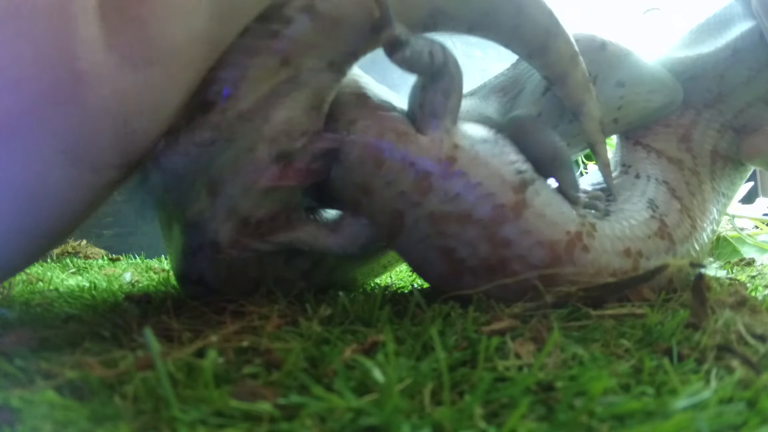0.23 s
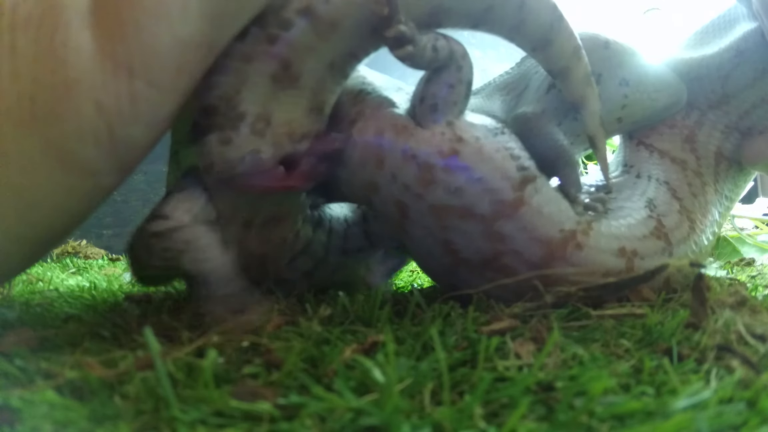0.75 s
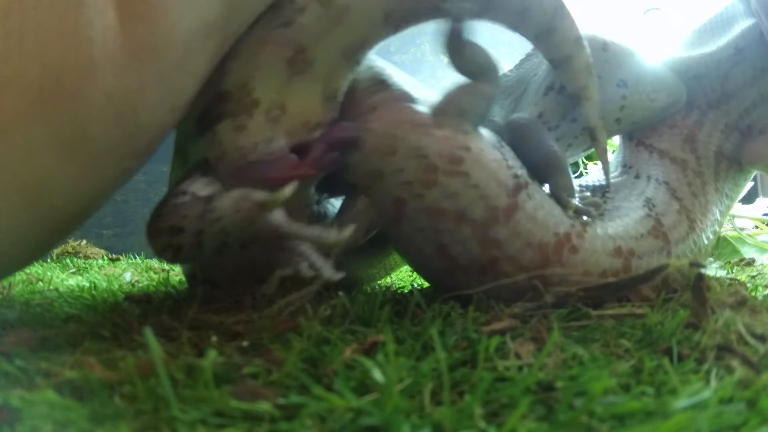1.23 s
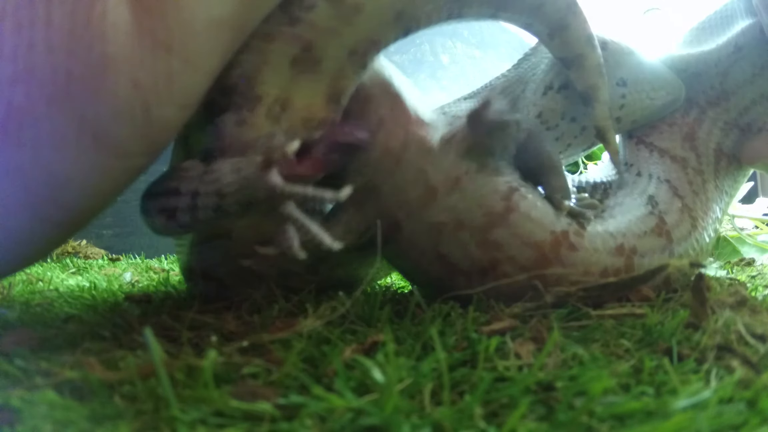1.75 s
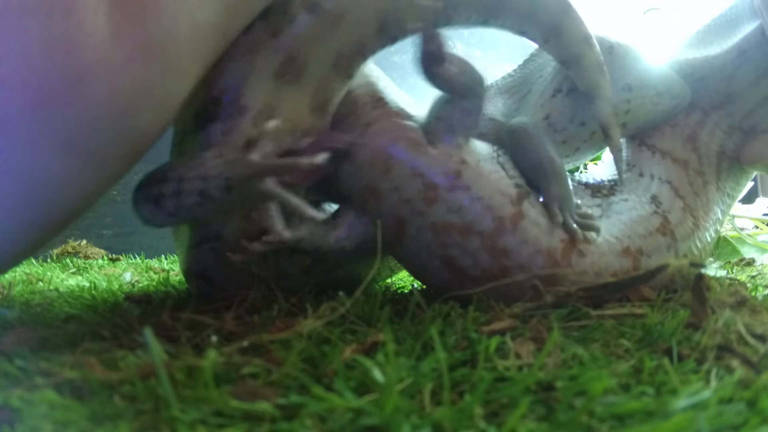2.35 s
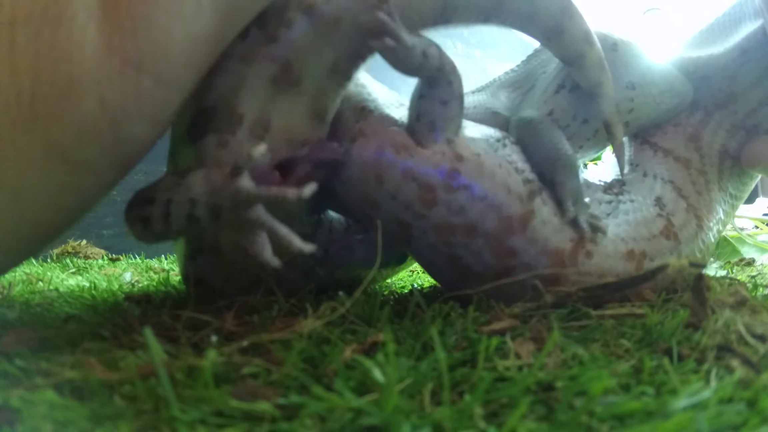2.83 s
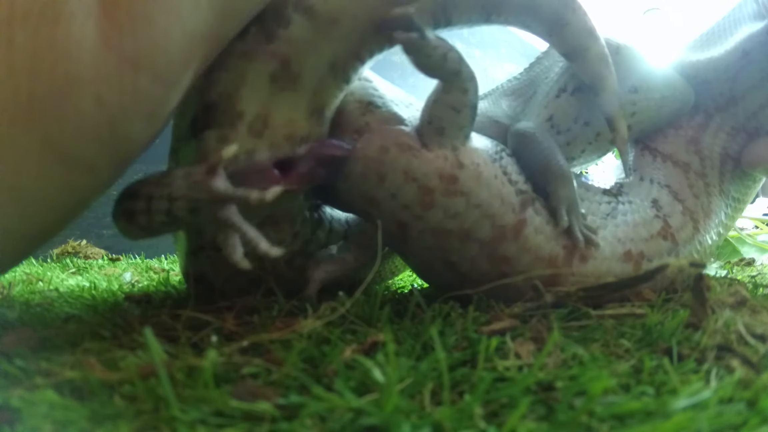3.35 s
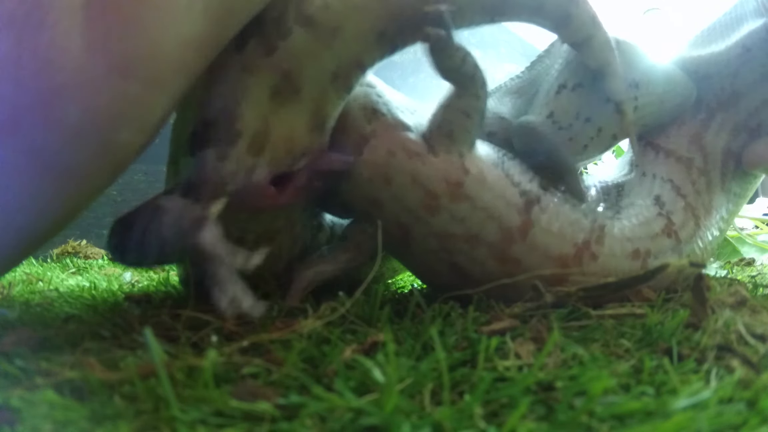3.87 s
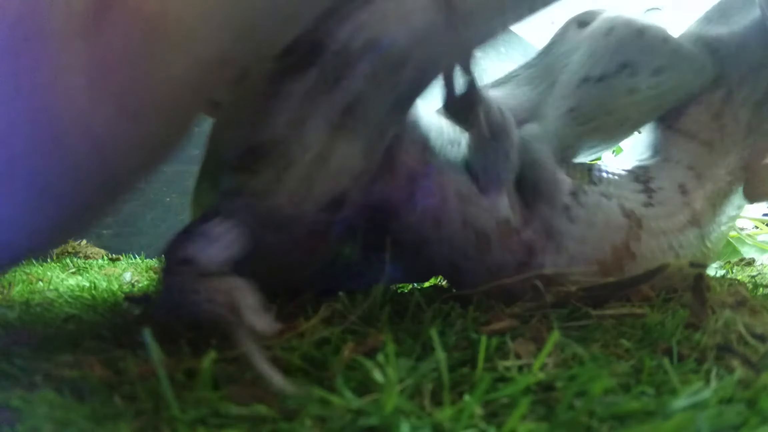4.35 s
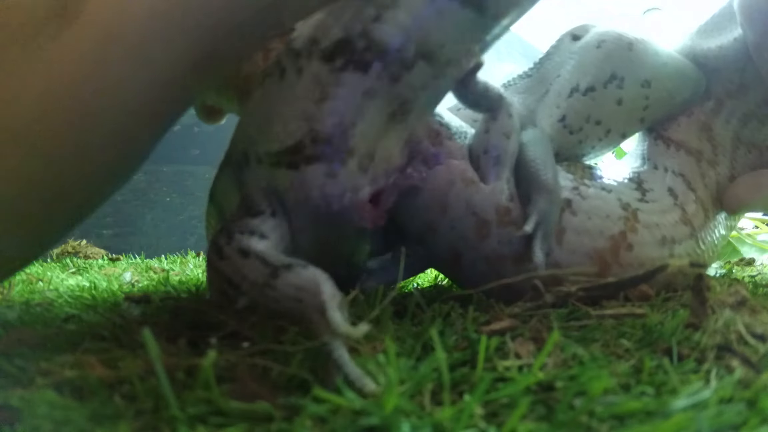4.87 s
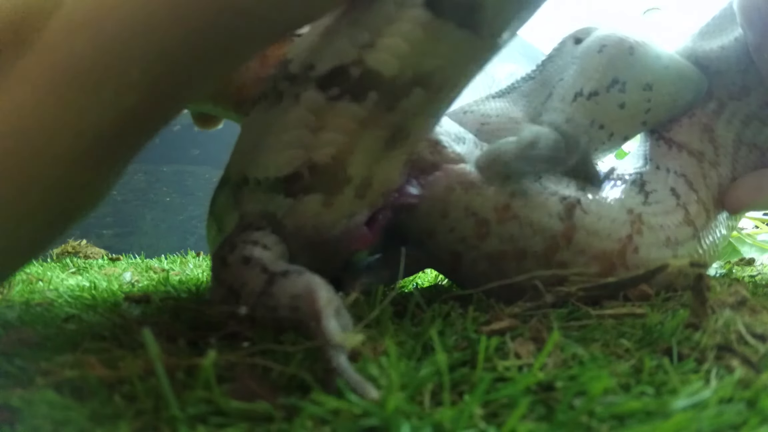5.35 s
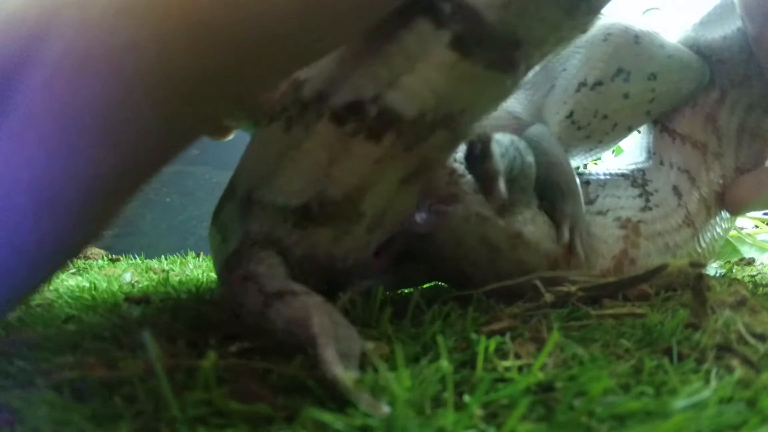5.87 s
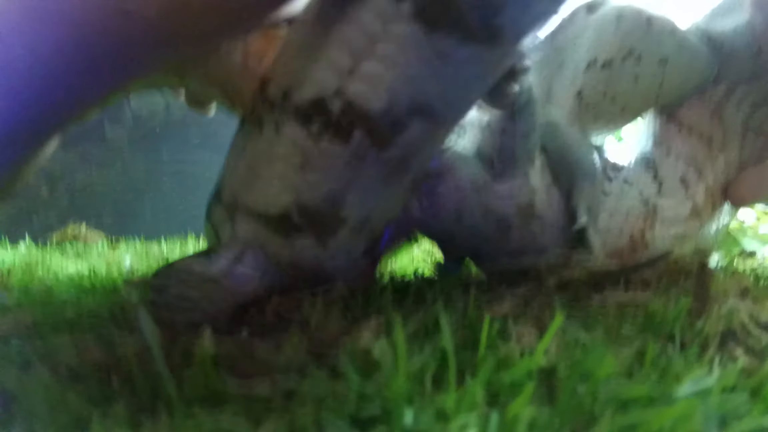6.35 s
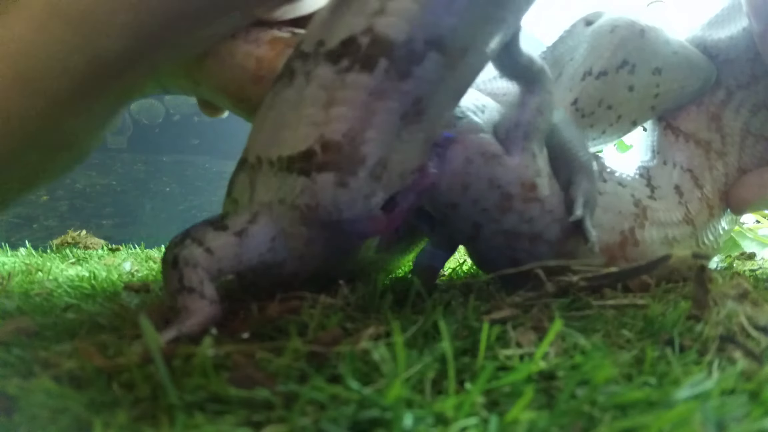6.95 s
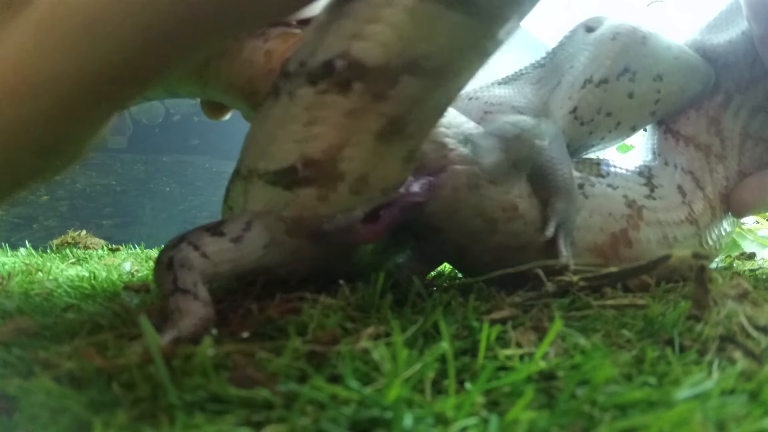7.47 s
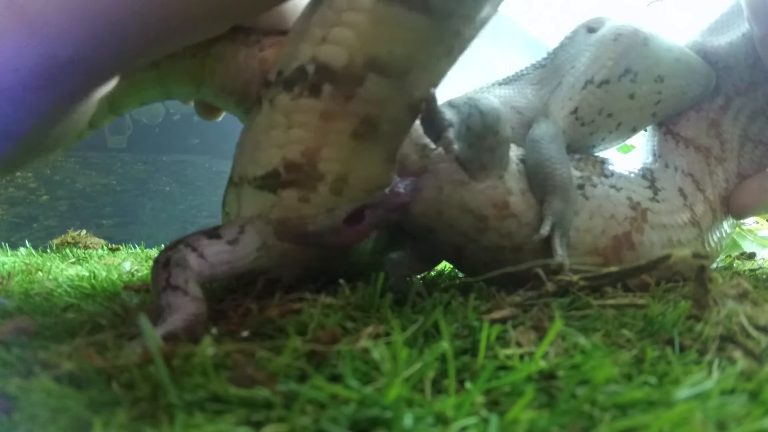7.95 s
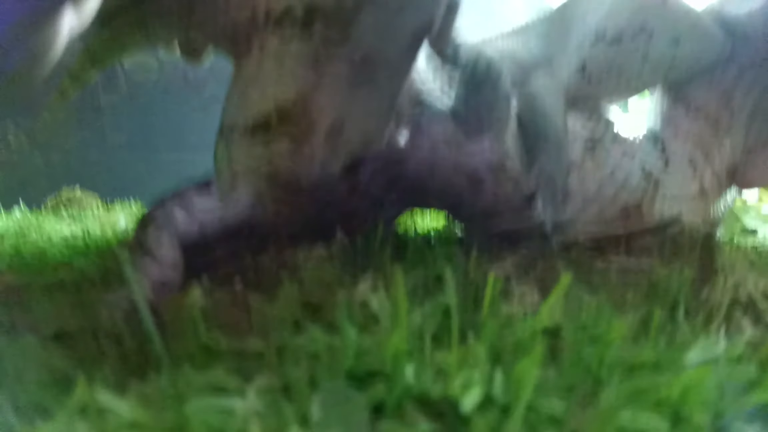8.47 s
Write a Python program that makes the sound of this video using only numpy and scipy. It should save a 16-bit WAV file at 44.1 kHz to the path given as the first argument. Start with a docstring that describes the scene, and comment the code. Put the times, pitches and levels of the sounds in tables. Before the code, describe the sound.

Clawed feet snap and crackle short blades in an enclosure, heard from ground level. Quiet rustles come in bouts, broken by two boxy knocks, the second stronger. Later there are soft, dry skin-on-skin strokes and busier snapping. Underneath, a distant low engine drone beats and slowly sags in pitch over soft rumble. At the end, blades rasp loudly against the casing right beside the microphone.

```python
"""Lizards wrestling on turf

Two lizards wrestle on short turf in an enclosure, right before a small camera lying on the ground.
Noise through resonances makes blades rustle and snap under claws, scales slide on scales and blades
scrape the camera case; ringing modes are knocks on the enclosure. Far off, the sines of two engines
beat and sag in pitch over outdoor rumble of shaped noise."""
import sys
import numpy as np
from scipy import signal
from scipy.fft import rfft, irfft, next_fast_len
from scipy.io import wavfile
from scipy.ndimage import uniform_filter1d

SR = 44100
rng = np.random.default_rng(int(sys.argv[2]) if len(sys.argv) > 2 else 0)


def transcribe(signal):
    """Save signal, clipped to [-1, 1], as a 16-bit WAV file at the path in sys.argv[1]."""
    frames = np.atleast_2d(signal).T
    limited = np.clip(frames, -1, 1)
    pcm = np.round(limited * 32767).astype(np.int16)
    wavfile.write(sys.argv[1], SR, pcm)


N = 384111


def undb(db):
    """Decibels to gain."""
    return 10 ** (np.asarray(db) / 20)


def unit(x):
    """Scale to rms 1."""
    return x / np.sqrt(np.mean(x ** 2))


def walk(rate):
    """Random levels held 1 / rate s and smoothed by two running means; rms 1."""
    hold = int(SR / rate)
    steps = np.repeat(rng.standard_normal(N // hold + 1), hold)
    return unit(uniform_filter1d(uniform_filter1d(steps, hold), hold)[:N])


def gains(tables):
    """Summed gain curves from (s, dB, ..) tables, each silent outside its own span."""
    t = np.arange(N) / SR
    total = 0
    for table in tables:
        s, *columns = np.transpose(table)
        total = total + np.array([undb(np.interp(t, s, db, -200, -200)) for db in columns])
    return total


def ring(x, peaks):
    """Sum of twice-applied resonances, scaled so that unit white noise comes out at rms 1."""
    both = np.zeros((2, N))
    both[0] = x
    both[1, 0] = 1  # an impulse, to find the gain for noise
    out = 0
    for k, (hz, width, db) in enumerate(peaks):
        b, a = signal.iirpeak(hz, hz / width / 1.5, fs=SR)  # two passes narrow it back to the width
        passed = signal.lfilter(b, a, signal.lfilter(b, a, both))
        out = out + (-1) ** k * undb(db) * passed
    return out[0] / np.sqrt(np.sum(out[1] ** 2))


def coloured(points):
    """Steady noise of rms 1 with a (Hz, dB) spectrum, interpolated over log frequency."""
    hz, db = np.transpose(points)
    size = next_fast_len(N)
    bins_hz = np.arange(size // 2 + 1) * SR / size
    shape = undb(np.interp(np.log(bins_hz + 1e-3), np.log(hz), db))
    return unit(irfft(rfft(rng.standard_normal(size)) * shape, size)[:N])


def grit(per_s, spread_db, t60, smooth):
    """Tiny random cracks with a long-tailed size law, each a short swelling and dying burst, over even hiss."""
    happens = rng.random(N) < per_s / SR
    sizes = happens * undb(np.minimum(spread_db * rng.exponential(size=N), 16))
    for share in (1, .8):  # the second pole rounds the start
        sizes = signal.lfilter([1], [1, -np.exp(-np.log(1000) / (share * t60 * SR))], sizes)
    return unit(unit(sizes) + smooth) * rng.standard_normal(N)


def bursts(times, t60s, crack, spiky, *levels_db):
    """One dying noise burst per event, led by a one-sample crack; a row of output for each level column."""
    out = np.zeros((len(levels_db), N))
    size = SR // 10
    noise = rng.standard_normal((len(times), size))
    noise = unit(noise * np.abs(noise) ** spiky)  # stick-slip friction has tall spikes
    t = np.arange(size) / SR
    for s, t60, hiss, db in zip(times, t60s, noise, np.transpose(levels_db)):
        i = int(s * SR)
        burst = hiss * 1000. ** (-t / np.clip(t60, .004, .2))
        burst *= 1 - np.exp(-t / 0.00065)
        burst[0] = crack
        out[:, i:i + size] += (undb(db)[:, None] * burst)[:, :N - i]
    return out


# Outdoor rumble alike at both microphone ports. Each row: frequency in Hz, relative density in dB per Hz.
AIR_SPECTRUM = [(7.1, -60), (12, 2), (42, -4), (76, -5.5), (156, -13.5), (181, -20), (444, -25), (694, -29),
                (935, -44.5), (1150, -63), (3090, -46), (9880, -50), (15000, -61)]
# Low rumble of opposite sign at the two ports. Each row: frequency in Hz, relative density in dB per Hz.
SIDE_SPECTRUM = [(7.1, -34), (12, -17), (17, -2), (24, -18), (33, -29.5), (84, -38.5), (150, -48.5),
                 (4000, -100.5), (5200, -122), (8800, -120)]
AIR_DB, SIDE_DB = -50, -54.5


def rumble():
    """Outdoor rumble: shaped noise whose common part flickers in level; returns common and opposed parts."""
    common = undb(AIR_DB) * coloured(AIR_SPECTRUM) * undb(0.6 * walk(5) + 1.0 * walk(25))
    opposed = undb(SIDE_DB) * coloured(SIDE_SPECTRUM)
    return common, opposed


# Two far engines fading with the air. Each row: time in seconds, slower engine in dB, faster engine in dB.
ENGINE_LEVELS = [(0, -53.5, -66), (.5, -49, -61), (1.5, -54.5, -50), (2, -55.5, -48.5), (2.5, -49, -56.5),
                 (3, -55, -61.5), (3.5, -57, -51.5), (4, -49.5, -50), (5, -67, -51), (5.5, -47, -53.5),
                 (6, -43.5, -47.5), (6.5, -43.5, -59), (7, -53, -53), (7.5, -48.5, -46), (8, -46, -65),
                 (8.5, -40, -60), (8.71, -44, -55)]
# Their second partials. Each row: time in seconds, slower engine in dB, faster engine in dB.
OVERTONE_LEVELS = [(0, -80, -70), (2, -67, -70.5), (3.5, -65, -67), (4.5, -58.5, -72), (5.5, -78, -80),
                   (6.2, -76, -69), (7.5, -84, -60.5), (8, -64, -56), (8.71, -52.5, -84)]
# Beats so far, as the faster engine draws ahead. Each row: time in seconds, lead in turns.
ENGINE_LEAD = [(0, -.8), (1.5, 4.51), (2.5, 8.54), (3, 10.12), (4, 14), (5, 17.5), (6, 21.24), (7, 24.42),
               (7.5, 26.31), (8.71, 31.3)]
ENGINE_HZ, SAG_HZ_PER_S = 74.66, 1.1  # slower engine at the start, and its fall


def drone():
    """Two engines slightly out of step beat against each other while their pitch sags."""
    t = np.arange(N) / SR
    slow_hz = ENGINE_HZ - SAG_HZ_PER_S * t + 0.32 * walk(6)
    slow_turns = np.cumsum(slow_hz) / SR
    fast_turns = slow_turns + np.interp(t, *np.transpose(ENGINE_LEAD))
    phase = 2 * np.pi * np.array([slow_turns, fast_turns])
    first = gains([ENGINE_LEVELS]) * np.sin(phase)
    second = gains([OVERTONE_LEVELS]) * np.sin(2 * phase)
    return np.sqrt(2) * np.sum(first + second, axis=0)  # so that the levels are rms


# Knocks on the enclosure. Each row: start in seconds, level in dB, hardness in dB per octave above 190 Hz.
KNOCK_EVENTS = [(0.978, -45, -1.5), (1.17, -48, -4), (1.428, -30, -1.5), (1.433, -42, 3),
                (4.338, -44.5, -5), (4.572, -24, 3), (5.629, -49, 1.5), (5.835, -50, -2)]
# Modes of the enclosure panel. Each row: frequency in Hz, relative level in dB, 60 dB decay in seconds.
PANEL_MODES = [(131.6, 1, 0.17), (191.3, -0.5, .13), (251, -16.5, 0.19), (328, -12.5, 0.12),
               (474, -11.5, 0.082), (577, 1, 0.029), (686, -12, 0.042), (990, -17, 0.045),
               (1170, -18.5, 0.024), (1560, -27.5, 0.027)]
# Loose fittings on the panel. Each row: frequency in Hz, width in Hz, relative level in dB.
FITTINGS = [(387, 210, 3), (730, 970, -7), (1300, 310, -14)]
RATTLE_DB, RATTLE_T60_S = -14.5, .12  # level relative to the knock


def knocks():
    """Each knock rings the panel modes and rattles its fittings; harder blows lift upper modes, low ones build up late."""
    out = np.zeros(N)
    t = np.arange(SR // 4) / SR
    for s, db, hard_db in KNOCK_EVENTS:
        blow = 0
        for k, (hz, mode_db, t60) in enumerate(PANEL_MODES):
            gain = (-1) ** k * undb(mode_db + hard_db * np.log2(hz / 190))
            build_up = 1 - np.exp(-(t * hz / 1.14) ** 2)
            blow = blow + gain * np.sin(2 * np.pi * hz * t) * 1000. ** (-t / t60) * build_up
        i = int(s * SR)
        out[i:i + len(t)] += undb(db) * blow
    s, db, _ = np.transpose(KNOCK_EVENTS)
    rattle = bursts(s, np.full(len(s), RATTLE_T60_S), 0, 0, db + RATTLE_DB)[0]
    return out + ring(rattle, FITTINGS)


# Blades dragged over the camera case. Each row: start in seconds, length in seconds, level in dB.
SCRAPE_STROKES = [(5.385, 0.09, -37), (8.531, 0.083, -24)]
# Single slips of a blade on the case, beside the microphone.
# Each row: start in seconds, level in dB, case boom relative to it in dB, 60 dB decay in seconds.
BLADE_SLIPS = [(5.393, -36, -3.5, 0.033), (5.408, -28, -10.5, .04), (5.426, -30, -14, .03),
               (5.449, -31.5, -10, .035), (5.471, -37.5, -13, 0.043), (5.486, -43, -4, .03),
               (5.493, -36, -10, .016), (5.516, -47, -14, .02), (8.537, -27.5, -5.5, .031),
               (8.551, -18, -6.5, .05), (8.566, -24, -18, .026), (8.574, -17.5, -6.5, .024),
               (8.581, -32, -17, .04), (8.592, -17.5, -7.5, 0.034), (8.614, -26.5, -7, 0.022),
               (8.630, -25.5, -4, 0.012), (8.633, -31, -12, 0.0098), (8.6372, -22.5, -10.5, 0.013),
               (8.6585, -29, -13, 0.0099), (8.681, -50, -6, .015)]
# Bright resonances of the case. Each row: frequency in Hz, width in Hz, relative level in dB.
CASE_BRIGHT = [(4210, 1080, 6.5), (5220, 380, 15), (6070, 520, 12.5), (7340, 810, 10), (7900, 500, 14),
               (9600, 3700, 11), (11740, 3900, 7)]
# Boom of the case. Each row: frequency in Hz, width in Hz, relative level in dB.
CASE_LOW = [(1044, 564, 5), (1540, 1360, -4)]
SCRAPE_ATTACK_S, SCRAPE_RELEASE_S = 0.035, 0.019
SCRAPE_EDGE_DB, BOOM_DB = -27.5, -9.5  # ends of a scrape below its level; boom of a scrape


def case():
    """Blades stick and slip on the case next to the microphone."""
    drags = []
    for s, length, db in SCRAPE_STROKES:
        end = s + length
        drags.append([(s, db + SCRAPE_EDGE_DB), (s + SCRAPE_ATTACK_S, db),
                      (end - SCRAPE_RELEASE_S, db), (end, db + SCRAPE_EDGE_DB)])
    scrape = gains(drags)[0] * grit(per_s=1500., spread_db=6., t60=0.0009, smooth=0.25)
    s, db, boom_db, t60 = np.transpose(BLADE_SLIPS)
    bright, boom = bursts(s, t60, 3.8, 1.2, db, db + boom_db)
    return ring(scrape + bright, CASE_BRIGHT) + ring(undb(BOOM_DB) * scrape + boom, CASE_LOW)


# Strokes of scales on scales, close by. Each row: start in seconds, peak in seconds, end in seconds,
# whistling band in dB, fine hiss in dB.
SLIDE_STROKES = [(5.62, 5.67, 5.81, -59, -62), (5.83, 5.87, 5.95, -62, -55),
                 (5.9, 5.976, 6.025, -53.5, -48), (6.026, 6.076, 6.2, -52.5, -52),
                 (6.12, 6.175, 6.22, -52.5, -43), (6.18, 6.248, 6.3, -53.5, -63),
                 (6.295, 6.367, 6.46, -57.5, -56.5), (8.17, 8.213, 8.22, -57, -54),
                 (8.242, 8.262, 8.1, -58, -63), (8.32, 8.419, 8.62, -48.5, -52.5),
                 (8.433, 8.53, 8.56, -51.5, -62)]
# Whistling band of dry skin. Each row: frequency in Hz, width in Hz, relative level in dB.
WHISTLE_BAND = [(4540, 170, 3.5), (4230, 710, -16)]
# Fine hiss of the scales. Each row: frequency in Hz, width in Hz, relative level in dB.
SCALE_HISS = [(7660, 1100, 3), (9800, 1100, -6), (13600, 3100, -9)]
STROKE_EDGE_DB, BRUSH_DB = -17.5, -6.5  # ends of a stroke below its peak; blades brushed along


def stroke(start, peak, end, *db):
    """A rounded swell and fade: a quarter of the way down in dB at half time."""
    times = (start, (start + peak) / 2, peak, (peak + end) / 2, end)
    shares = (1, 1 / 4, 0, 1 / 4, 1)
    return [(s, *(np.array(db) + share * STROKE_EDGE_DB)) for s, share in zip(times, shares)]


def scales():
    """Dry skin on skin: each stroke is a narrow whistling band and a fine hiss, and brushes the blades."""
    whistle, hiss = gains([stroke(*row) for row in SLIDE_STROKES])
    rub = grit(per_s=134.0, spread_db=1.5, t60=0.03, smooth=1.5)
    brushed = undb(BRUSH_DB) * ring(whistle * rub, BLADE_CRISP[:2])
    return ring(whistle * rub, WHISTLE_BAND) + ring(hiss * rub, SCALE_HISS) + brushed


# Bodies pressing the turf. Each row: time in seconds, dull rustle in dB, crisp rustle in dB.
RUSTLE_LEVELS = [(0, -67, -67), (.55, -71.5, -73), (.85, -57.5, -58.5), (1.0, -62, -61), (1.2, -68.5, -66),
                 (1.95, -67.5, -67), (2.18, -73.5, -73.5), (2.5, -68, -66), (2.86, -74.5, -72.5),
                 (3.2, -63, -62), (3.5, -63.5, -63.5), (3.7, -69, -68.5), (3.9, -68.5, -65),
                 (4.05, -61.5, -59.5), (4.3, -62.5, -62), (4.48, -59.5, -60.5), (4.62, -64, -63),
                 (4.68, -60, -59.5), (4.76, -66, -64), (4.83, -62.5, -62.5), (5.1, -64, -64),
                 (5.35, -68, -69), (5.48, -63.5, -61), (5.89, -65, -66), (6.05, -67.5, -63),
                 (6.15, -58, -57), (6.35, -63, -58), (6.86, -64, -61), (7.2, -62.5, -61.5),
                 (7.75, -70.5, -67.5), (7.98, -68.5, -67), (8.12, -63.5, -63.5), (8.5, -63, -60),
                 (8.64, -56.5, -52), (8.71, -65, -61)]
# Claws snapping blades right before the microphone.
# Each row: start in seconds, level in dB, dull part relative to it in dB, 60 dB decay in seconds.
LOUD_SNAPS = [(0.0779, -35.5, -22, 0.025), (0.654, -57, 0, 0.057), (0.7546, -53, 1.5, 0.033),
              (0.835, -50.5, 2, 0.039), (0.8527, -48, -2, 0.05), (0.8834, -46.5, -3, 0.029),
              (0.905, -52, -15, 0.039), (0.976, -40.5, -4, 0.075), (0.9942, -39, -2.5, 0.054),
              (1.0197, -46.5, -4, 0.035), (1.063, -44, -4, 0.05), (1.0742, -44, -6, 0.026),
              (1.1378, -49, -3, 0.028), (1.1484, -45.5, -3.5, 0.037), (1.1947, -48.5, -10, 0.05),
              (1.2446, -56, -20, 0.043), (1.5484, -46.5, -7, 0.042), (1.652, -51, -9, 0.046),
              (1.674, -50.5, -2, 0.05), (1.8262, -48.5, -1, 0.032), (1.8973, -48, -5, 0.05),
              (2.158, -54, 2.5, 0.032), (2.177, -52, -8, 0.05), (2.9312, -47.5, -23, 0.042),
              (3.036, -52, -5, 0.05), (3.3543, -55, -11, 0.058), (3.3734, -50, -11, 0.046),
              (3.387, -49.5, -5, 0.058), (3.4433, -52.5, 3, 0.03), (3.5404, -49.5, -3, 0.062),
              (3.5848, -51.5, -11, 0.05), (3.6452, -46, -4, 0.048), (3.705, -54, -8, 0.033),
              (3.8786, -47, 1, 0.033), (3.8977, -47.5, 2, 0.058), (3.9347, -47.5, -4, 0.066),
              (3.9734, -50, -5, 0.045), (4.1674, -48.5, -3.5, 0.065), (4.196, -44, -1.5, 0.05),
              (4.339, -40, -6, 0.035), (4.469, -57, -1, 0.05), (4.6484, -53, -3, 0.1),
              (4.6872, -49.5, -0.5, 0.075), (4.794, -44, -3, 0.066), (4.816, -43, -1.5, 0.031),
              (4.8552, -49, 1.5, 0.035), (4.919, -44.5, -6, 0.042), (4.9695, -42, -4, 0.068),
              (5.0408, -40, -5, 0.035), (5.1543, -49.5, -6, 0.042), (5.3009, -46.5, -3, 0.034),
              (5.3193, -47.5, -6, 0.068), (5.3613, -49, -6, 0.056), (5.6328, -45.5, -11, 0.05),
              (5.771, -52, -14, 0.05), (5.8372, -46.5, -17, 0.05), (6.2714, -32, -20, 0.017),
              (6.3969, -45, -17, 0.042), (6.5175, -42, -26, 0.031), (6.553, -43.5, -10.5, 0.1),
              (6.6154, -45.5, -5.5, 0.037), (6.6633, -44, -11, 0.05), (6.6832, -42.5, -5.5, 0.06),
              (6.7067, -44, -18, 0.051), (6.8483, -45.5, -7, 0.034), (6.8892, -50, -6, 0.054),
              (7.0211, -40, 0, 0.045), (7.0783, -37.5, -3, 0.025), (7.095, -42.5, -10, 0.061),
              (7.1157, -41.5, -8, 0.05), (7.1763, -48.5, -8, 0.076), (7.2067, -42.5, -6, 0.046),
              (7.224, -46, -5.5, 0.073), (7.3075, -40, -11.5, 0.026), (7.3517, -42.5, -9, 0.039),
              (7.3614, -42, -7, 0.023), (7.9164, -54, -8, 0.072), (7.9453, -48.5, -9, 0.084),
              (7.9954, -44, -9, 0.022), (8.0166, -47.5, -3.5, 0.037), (8.0628, -37.5, -6, 0.063),
              (8.087, -43, -5.5, 0.071), (8.1313, -40.5, -6.5, 0.047), (8.1783, -49, -12, 0.068),
              (8.313, -49.5, -11, 0.03)]
# Dull resonances of the mat. Each row: frequency in Hz, width in Hz, relative level in dB.
MAT_DULL = [(1100, 614, -3), (1371, 151, 3), (1615, 220, -0.5), (2260, 810, -4.5)]
# Crisp resonances of the blades. Each row: frequency in Hz, width in Hz, relative level in dB.
BLADE_CRISP = [(3840, 2640, 1), (5620, 3690, 9.5), (6625, 7140, 5), (11960, 6200, -2.5)]
BRIGHT_DB = -2  # bright part of a loud snap, relative to its level
SMALL_SNAPS, SNAP_T60_S = 80, 0.057
SMALL_SNAP_DB, SMALL_SCATTER_DB = 4, 3  # mean level over the crisp rustle; scatter of each part


def turf():
    """Rustle, loud snaps and a scatter of small ones share the resonances of mat and blades."""
    dull, crisp = gains([RUSTLE_LEVELS])
    cracks = grit(per_s=350., spread_db=3.0, t60=0.018, smooth=1.0)

    s, db, dull_db, t60 = np.transpose(LOUD_SNAPS)
    loud = bursts(s, t60, 7.5, 0.38, db + dull_db, db, db + BRIGHT_DB)

    s = rng.random(SMALL_SNAPS) * (N - 1) / SR
    rustle_db = np.interp(s, *np.transpose(RUSTLE_LEVELS)[[0, 2]])
    scatter_db = SMALL_SCATTER_DB * rng.standard_normal((3, SMALL_SNAPS))
    small = bursts(s, np.full(SMALL_SNAPS, SNAP_T60_S), 10.0, 0.5, *(rustle_db + SMALL_SNAP_DB + scatter_db))

    low, mid, high = loud + small
    dull_rustle = dull * undb(1.77 * walk(14)) * cracks  # the dull part wavers in level
    return (ring(dull_rustle + low, MAT_DULL) + ring(crisp * cracks, BLADE_CRISP)
            + ring(mid, BLADE_CRISP[:2]) + ring(high, BLADE_CRISP[2:]))


def scene():
    """All sources reach both microphone ports alike; only the low rumble differs a little."""
    air, side = rumble()
    mid = air + drone() + knocks() + case() + scales() + turf()
    return np.array([mid + side, mid - side])


# Steady offset of the converter. Each row: one channel, offset as a share of full scale.
CHANNEL_OFFSETS = [
    [.02373],
    [-.02077],
]
THIN_HZ, TOP_HZ = 15300, 16500


def record(dry):
    """The top thins out, then is cut; the converter adds a steady offset to each channel."""
    thin = signal.sosfilt(signal.ellip(6, .2, 30, THIN_HZ, fs=SR, output="sos"), dry)
    cut = signal.ellip(8, .2, 50, TOP_HZ, fs=SR, output="sos")
    return signal.sosfilt(cut, thin + np.array(CHANNEL_OFFSETS))


dry = scene()
out = record(dry)
transcribe(out)
```